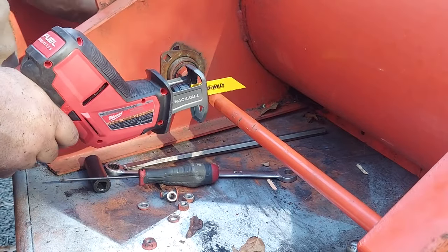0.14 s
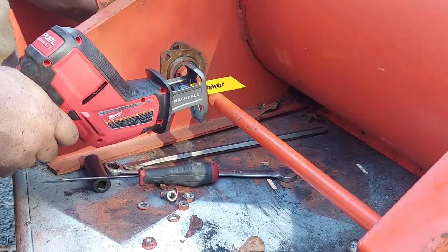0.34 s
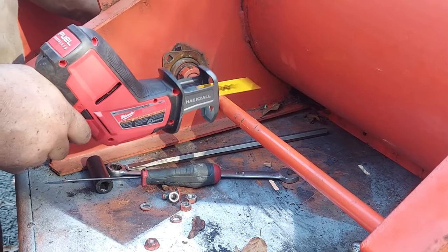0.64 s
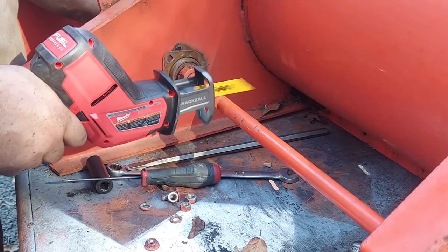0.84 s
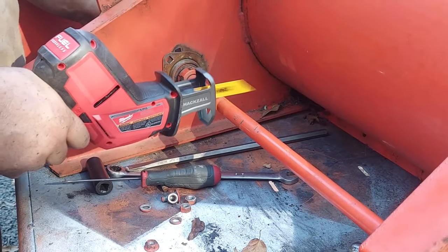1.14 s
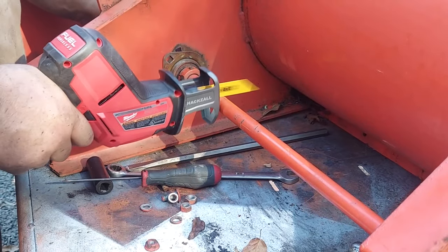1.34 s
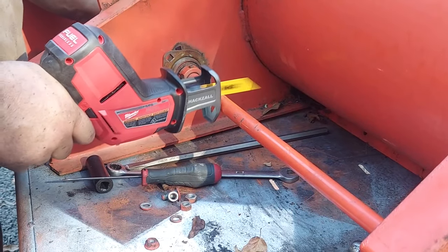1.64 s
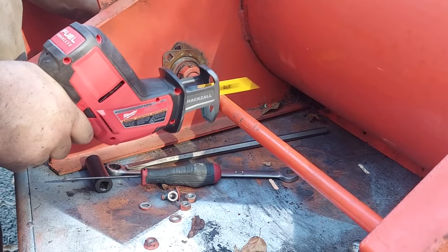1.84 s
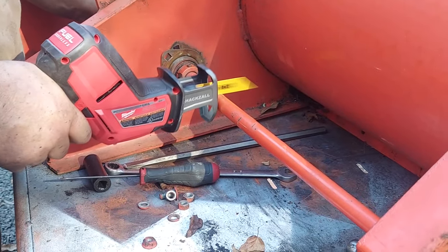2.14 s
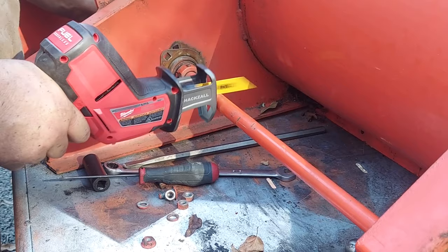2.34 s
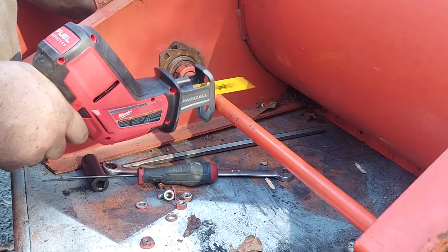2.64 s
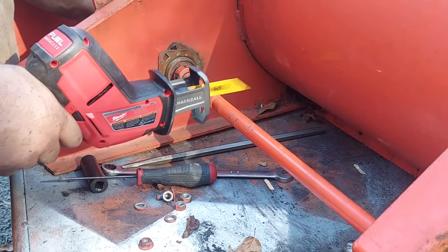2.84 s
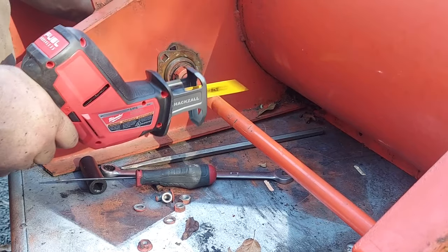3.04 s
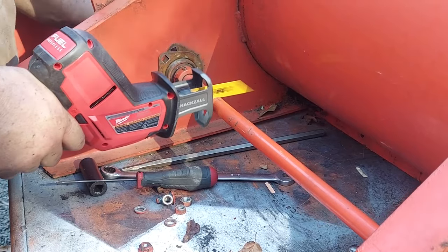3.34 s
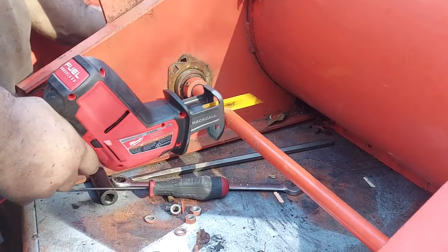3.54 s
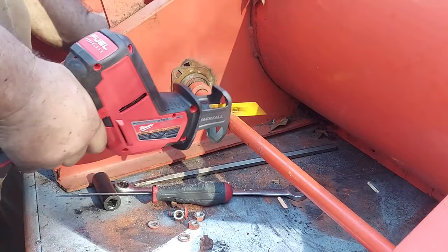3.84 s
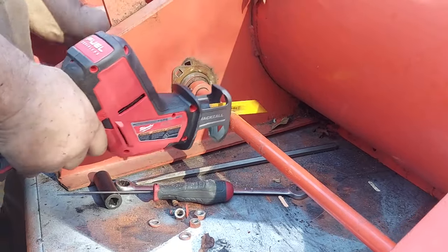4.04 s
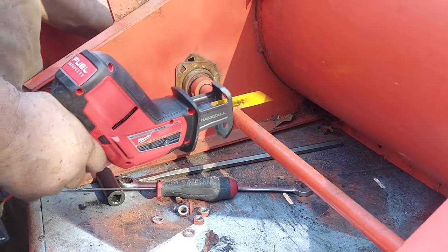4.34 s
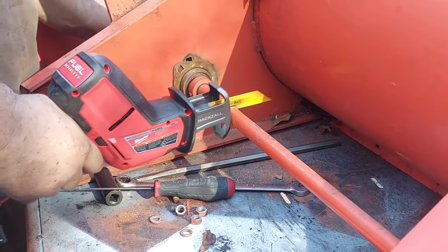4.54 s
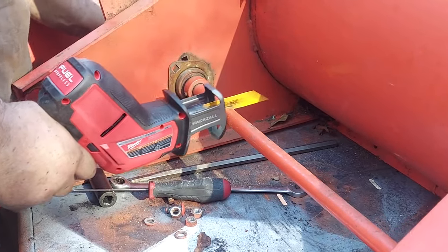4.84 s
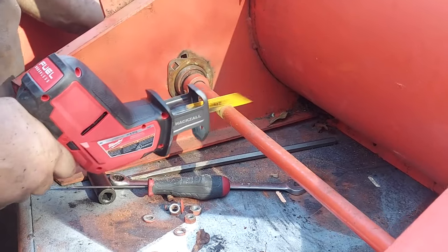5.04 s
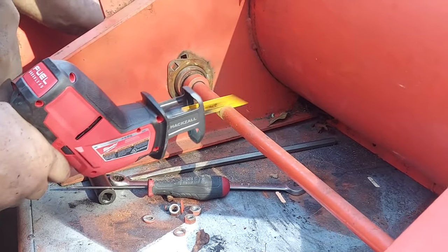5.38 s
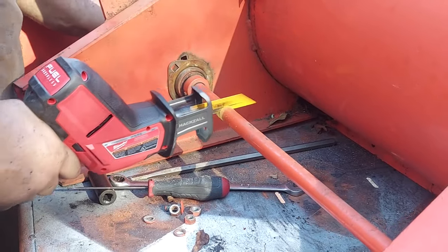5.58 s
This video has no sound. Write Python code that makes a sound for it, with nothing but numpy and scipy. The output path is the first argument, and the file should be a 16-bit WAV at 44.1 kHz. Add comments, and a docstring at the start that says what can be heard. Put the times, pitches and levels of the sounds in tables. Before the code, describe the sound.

A blade clinks lightly against steel, then a cordless reciprocating saw starts cutting a shaft inside a sheet-metal housing. Its rapid strokes rattle and ring the metal, with a hissing rasp and a thin high tone on top. About halfway through, the rasp drops out and the sawing abruptly turns into a much higher, sped-up buzz, steps up once more and runs on. The sound is close, over very faint background noise.

```python
"""Reciprocating saw on a steel shaft

A cordless saw clinks down inside a sheet-metal housing and cuts at about 41 strokes a second.
Each stroke shakes the panels, rattles shoe and blade and rings the shaft; the teeth rasp on top.
After three seconds the rasp drops out and the cut runs in fast motion, five and then six times
as fast, with pitch and stroke rate rising to match."""
import sys
import numpy as np
from scipy import signal
from scipy.fft import rfft, irfft, next_fast_len
from scipy.io import wavfile
from scipy.ndimage import uniform_filter1d, map_coordinates

SR = 44100
rng = np.random.default_rng(int(sys.argv[2]) if len(sys.argv) > 2 else 0)


def unload_audio(sound):
    """Save the sound as a 16-bit wav file, at the path given as the first command line argument."""
    columns = np.transpose(np.atleast_2d(sound))
    # keep every value between -1 and 1, then stretch to whole-number steps
    steps = np.round(np.clip(columns, -1, 1) * 32767)
    wavfile.write(sys.argv[1], SR, steps.astype(np.int16))


N = 251811


def from_db(db):
    """Decibels to gain."""
    return 10 ** (np.asarray(db) / 20)


def rms_one(x):
    """Scale to unit power."""
    return x / np.sqrt(np.mean(x ** 2) + 1e-20)


def in_time(rows, t):
    """Read each column of an automation curve at the times t."""
    s, *columns = np.transpose(rows)
    return [np.interp(t, s, c) for c in columns]


def at_hz(points, hz):
    """Read a curve on a log-frequency axis."""
    f, value = np.transpose(points)
    return np.interp(np.log(hz + 1e-3), np.log(f), value)


def drift(t, rate):
    """Random modulation of spread 1 that turns about rate times a second."""
    knots = np.arange(t[0], t[-1] + 2 / rate, 1 / rate)
    return np.interp(t, knots, rng.standard_normal(len(knots))) * np.sqrt(3 / 2)


def rise(t, s, edge_s):
    """A smooth step from 0 to 1, centred on s."""
    return .5 + .5 * np.sin(np.pi * np.clip((t - s) / edge_s, -.5, .5))


def spell(t, start, end, edge_s):
    """Swell, hold and fade."""
    return rise(t, start, edge_s) * (1 - rise(t, end, edge_s))


def faded(x, edge_s=0.002):
    """Soften both ends of a stretch."""
    age = np.arange(x.shape[1]) / SR
    return x * np.sin(np.pi / 2 * np.minimum(np.minimum(age, age[::-1]) / edge_s, 1))


def evened(x, window_s=0.052):
    """Ride the gain to hold the running power at 1."""
    power = uniform_filter1d(np.mean(x ** 2, axis=0), int(window_s * SR))
    return x / np.sqrt(np.abs(power) + 1e-12)


def resonances(modes, hz):
    """Parallel resonators of alternating sign, rolled off steeply outside their range."""
    bank = sum((-1) ** k * from_db(db) * 1j * hz * width / (f * f - hz * hz + 1j * hz * width)
               for k, (f, width, db) in enumerate(modes))
    low, high = 0.56 * modes[0][0], 1.55 * modes[-1][0]
    return bank / np.sqrt((1 + (low / (hz + 1)) ** 8) * (1 + (hz / high) ** 8))


# stereo image at natural speed: (frequency [Hz], left-right correlation [0-1])
LIKENESS = [(100, 0.97), (500, 1), (1000, 0.74), (2500, 0.47), (8000, 0.11), (14000, 0.33)]
def radiate(pair, response, speed=1, left_lag_s=.00009):
    """Colour a mid-side pair by a response pitched up by speed; the left side arrives later."""
    size = next_fast_len(pair.shape[1])
    hz = np.arange(size // 2 + 1) * SR / size / speed
    mid, side = rfft(pair, size) * response(hz)
    alike = np.clip(at_hz(LIKENESS, hz), 0, 1)
    mid, side = np.sqrt(1 + alike) * mid, np.sqrt(1 - alike) * side
    left = (mid + side) * np.exp(-2j * np.pi * hz * left_lag_s)
    return irfft(np.array([left, mid - side]), size)[:, :pair.shape[1]]


# room tone colour: (frequency [Hz], level [dB])
AIR = [(30, -16), (100, -9.5), (270, -14.5), (600, -23.5), (1170, -35), (1540, -25), (2300, -44),
       (4700, -43.5), (6250, -25.5), (8900, -47), (16000, -70)]
def room_tone():
    """A faint bed of rumble and hiss from the surroundings."""
    bed = radiate(rng.standard_normal((2, N)), lambda hz: from_db(at_hz(AIR, hz)))
    return from_db(-57.5) * rms_one(bed)


# blade and trigger touch before the motor starts: (time [s], clink [dB], knock [dB])
TOUCHES = [(0.239, -28.5, -43), (0.248, -35, -43.5), (0.277, -52, -37), (0.288, -52, -49),
           (0.304, -60, -63), (0.363, -58, -56), (0.407, -31.5, -30.5)]
# partials of the free blade: (frequency [Hz], level [dB], t60 [s])
CLINK = [(3844, 6.5, 0.053), (3937, 4, 0.022), (7700, -13, 0.039), (8300, -18, 0.039)]
def touches(t, knock_t60=0.14, tail_t60=0.48, tail_db=-13, tick_db=-9):
    """Each touch clinks the blade and sends a knock through the housing, with a gritty tick on top."""
    clink, knock, tick = np.zeros((3, len(t)))
    for s, clink_db, knock_db in TOUCHES:
        age = np.maximum(t - s, 0)
        attack = np.minimum(age / .002, 1)
        for hz, db, t60 in CLINK:
            clink += attack * from_db(clink_db + db - 60 * age / t60) * np.sin(2 * np.pi * hz * age)
        hit = (t >= s) * from_db(knock_db)
        decay = from_db(-60 * age / knock_t60)
        knock += hit * (decay + from_db(tail_db - 60 * age / tail_t60))
        tick += hit * decay * from_db(tick_db)
    body = radiate(rng.standard_normal((2, len(t))), lambda hz: resonances(PANEL + SHOE + BLADE, hz))
    grit = radiate(rng.standard_normal((2, len(t))), lambda hz: from_db(at_hz(RASP, hz)))
    return clink + knock * rms_one(body) + tick * rms_one(grit)


def stroke_force(t, turns, speed, swing_db, pull_db, jolt_db=1):
    """Force swings twice a turn, harder on the pull than the return, and jolts as teeth catch."""
    angle = 2 * np.pi * turns
    jolts = drift(t, 450 * speed)
    return from_db(swing_db * np.cos(2 * angle) + pull_db * np.cos(angle) + jolt_db * jolts)


# rasp colour: (frequency [Hz], level [dB])
RASP = [(1820, -43), (3100, -4.5), (3480, -6.5), (3780, -4), (4100, -7.5), (4540, -1.5), (5380, -9.5),
        (6090, -7), (7120, -13.5), (7880, -9.5), (8560, -17), (9540, -18.5), (12100, -15), (15200, -18.5),
        (15800, -12)]
# rasp envelope: (time [s], level [dB])
BITE = [(0.41, -40.5), (0.46, -24.5), (0.5, -32), (1.05, -27), (2.13, -29), (2.36, -26.5), (2.96, -27.5)]
# the blade's thin note: (time [s], pitch [Hz], level [dB])
SINGING = [(0.42, 7900, -59), (0.49, 7950, -34), (0.57, 8250, -36), (0.85, 8130, -37.5), (1.15, 7950, -41),
           (2.0, 7950, -45), (2.95, 7860, -44)]
def teeth(t):
    """Teeth tear chips off the steel on every stroke, and the blade sings thinly."""
    turns = np.cumsum(in_time(CRANK, t)[0]) / SR
    force = stroke_force(t, turns, 1, swing_db=1.5, pull_db=1.2)
    grain = from_db(3.9 * rng.standard_normal(len(t)))
    chips = force * grain * rng.standard_normal((2, len(t)))
    rasp = evened(radiate(chips, lambda hz: from_db(at_hz(RASP, hz))))
    note_hz, note_db = in_time(SINGING, t)
    phase = 2 * np.pi * np.cumsum(note_hz) / SR
    note = np.array([drift(t, 260) * np.sin(phase) + drift(t, 180) * np.cos(phase) for _ in range(2)])
    return from_db(in_time(BITE, t)[0] + 5) * rasp + from_db(note_db) * rms_one(force * note)


# the saw bounces in the cut: (start [s], end [s], added looseness [0-1])
BOUNCES = [(.3, .82, .52), (1.274, 1.98, 0.47), (2.77, 2.97, 0.3), (3.082, 3.156, 0.32), (3.66, 4.25, 0.35)]
def looseness(t, seated=0.22, edge_s=0.19):
    """Share of the rattle that is new on every stroke: small when seated, large when bouncing."""
    bounce = sum(share * spell(t, start, end, edge_s) for start, end, share in BOUNCES)
    return np.clip(seated + bounce, .02, .98)


def repeating_rattle(turns, memory=0.97):
    """A rattle locked to the crank: each stroke keeps most of the pattern of the one before."""
    size, count = int(len(turns) / turns[-1]), int(turns[-1]) + 102
    pattern = signal.lfilter([1], [1, -memory], rng.standard_normal((count, size)), axis=0)[100:]
    return rms_one(map_coordinates(pattern.ravel(), [turns * size], order=3))


def crank_tones(t, turns, speed, harmonics, waver=0.15):
    """Clean multiples of the stroke rate, each wavering in level and phase."""
    out = np.zeros((2, len(t)))
    for k, db in harmonics:
        phase = 2 * np.pi * (k * turns + rng.random()) + waver * drift(t, 5 * speed)
        apart = k * (rng.normal(0, 0.036) - .028)   # higher tones sit wider in stereo
        out += from_db(db) * (1 + waver * drift(t, 5 * speed)) * np.sin([phase + apart, phase])
    return rms_one(out)


def ringing(t, speed, loose, drive, modes):
    """A part rings at about unit level, taking up the shaking unevenly."""
    ring = evened(radiate(drive, lambda hz: resonances(modes, hz), speed), window_s=0.057)
    return ring * from_db(1.58 * np.sqrt(loose) * drift(t, 16 * speed))


def throb(t, turns, speed, loose, harmonics):
    """The crank's low end; a bouncing saw adds a bump twice a turn."""
    tones = crank_tones(t, turns, speed, harmonics, waver=0.26)
    bump = crank_tones(t, turns, speed, [(2, 0)], waver=0.42)
    return tones + from_db(-3) * loose ** 2 * bump


# gearbox and frame modes at natural speed: (frequency [Hz], width [Hz], level [dB])
GEARBOX = [(213, 34, -12), (254, 24, -6.5), (321, 74, -13), (372.7, 27, 1), (417, 56, -3.5)]
FRAME = [(49.6, 54, -10), (77, 30, -0.5), (120, 7.5, 9), (164, 165, -4.5)]
def gearbox(t, turns, speed, loose, knocks, harmonics):
    """The gearbox hums when seated and clatters when loose; its knocks thud through the frame."""
    hum = crank_tones(t, turns, speed, harmonics, waver=0.52)
    clatter = ringing(t, speed, loose, knocks, GEARBOX)
    thud = ringing(t, speed, loose, knocks, FRAME)
    return np.sqrt(1 - loose) * hum + np.sqrt(loose) * clatter + from_db(-24.5) * thud


# panel modes at natural speed: (frequency [Hz], width [Hz], level [dB])
PANEL = [(483.5, 40, -3.5), (556.6, 32, 3), (620.6, 24, 1.5), (657, 14.6, 2), (754, 90, -6),
         (824, 38, -0.5)]
# panel envelope: (time [s], level [dB])
PANEL_LEVEL = [(.5, -24), (.8, -24.5), (1.45, -19), (1.7, -20.5), (1.95, -22.5), (2.2, -20), (2.88, -27.5),
               (2.97, -32.5), (3.45, -25), (5.28, -25.5), (5.4, -20), (5.71, -22.8)]
def panels(t, turns, speed, loose, knocks, harmonics):
    """The sheet metal drones with the crank's upper harmonics and clangs under its knocks."""
    drone = crank_tones(t, turns, speed, harmonics, waver=0.41)
    clang = ringing(t, speed, loose, knocks, PANEL)
    return from_db(in_time(PANEL_LEVEL, t)[0]) * (np.sqrt(1 - loose) * drone + np.sqrt(loose) * clang)


# steel modes at natural speed: (frequency [Hz], width [Hz], level [dB])
SHOE = [(863, 160, -6.5), (989, 45.6, 2), (1088, 76, -2), (1233, 36.5, 4), (1348, 200, -5.5)]
SHAFT = [(1462, 59, -16.5), (1524.3, 13.8, 0)]
BLADE = [(1669, 90, -4.5), (1953, 49, -5.5), (2085, 114, -11.5), (2542, 174, -3.5), (2632, 90, -2),
         (2904, 300, -13)]
BLADE_DEEP = [(1667, 89, -2.5), (1870, 124, -1.5), (2110, 130, -2), (2410, 89, -11), (2420, 220, 0),
              (2600, 60, -11)]   # damped, deep in the slot
# the teeth grab: (time [s], length [s], shaft boost [dB], blade boost [dB])
GRABS = [(0.522, 0.026, 10, -6), (0.674, .06, 7, -4.5), (1.145, 0.18, 3, 3.5), (1.847, 0.038, 7, 1),
         (2.35, 0.17, 5.5, 2), (2.59, 0.21, 4, 2.5), (2.763, .07, 6.5, 1), (2.886, 0.044, 8, 2.5),
         (3.293, 0.19, 0, 5), (3.434, 0.046, 1, 4.5), (3.602, .09, 0, 7.5), (3.97, 0.16, 2.5, 3),
         (4.289, 0.11, 5, 2.5), (4.564, 0.1, 6.5, 2.5), (4.87, 0.022, 10.5, 5), (5.1, 0.046, 4, 6.5),
         (5.71, 0.028, 10, -1)]
def steel(t, speed, loose, rattle, knocks, blade_modes, shoe_db, shaft_db, blade_db):
    """Shoe, shaft and blade ring with the rattle; the thin blade repeats itself least."""
    for s, length_s, shaft_boost_db, blade_boost_db in GRABS:
        grab = np.exp(-2 * ((t - s) / length_s) ** 2)
        shaft_db = shaft_db + shaft_boost_db * grab
        blade_db = blade_db + blade_boost_db * grab
    shoe = from_db(shoe_db) * ringing(t, speed, loose, rattle + 0.086 * knocks, SHOE)
    shaft = from_db(shaft_db) * ringing(t, speed, loose, rattle + 0.073 * knocks, SHAFT)
    blade = from_db(blade_db) * ringing(t, speed, loose, rattle + 0.45 * knocks, blade_modes)
    return shoe + pinch(t) * (shaft + blade)


# crank speed as heard in each stretch: (time [s], rate [strokes/s])
CRANK = [(0.5, 41.9), (1.14, 41.3), (1.18, 40.9), (2.07, 41.5), (2.68, 40.7), (2.8, 41.8), (2.96, 40.9)]
CRANK_FAST = [(2.971, 208.1), (3.224, 200), (3.294, 201.5), (3.399, 198.7)]
CRANK_FASTER = [(3.409, 235), (3.54, 238.9), (3.71, 229.9), (3.77, 236.4), (3.818, 225.5), (3.88, 235.1),
                (4.0, 238.5), (4.199, 236), (4.351, 234.8), (4.47, 228.8), (4.58, 235.7), (4.68, 229.5),
                (4.86, 231.7), (4.94, 236.7), (5.12, 240.9), (5.4, 234.4), (5.71, 231.4)]
# crank tones, balanced within throb (1-4), gearbox (5-11), panels (12-20): (harmonic, level [dB])
HARMONICS = [(1, -60), (2, -37), (3, -26), (4, -27.5), (5, -26.5), (6, -24.5), (7, -22), (8, -25.5),
             (9, -12), (10, -15.5), (11, -17.5), (12, -8.5), (13, 2), (14, -3), (15, -2.5), (16, -3),
             (17, -31), (18, -14.5), (19, -23.5), (20, -4.5)]
HARMONICS_FAST = [(1, -33.5), (2, -28), (3, -17), (4, -13), (5, -6.5), (6, -7), (7, -13), (8, -5.5),
                  (9, -14), (10, 3.5), (11, -6.5), (12, -11), (13, -14), (14, -4), (15, 2.5), (16, -4),
                  (17, -14), (18, -19), (19, -8), (20, -23)]
HARMONICS_FASTER = [(1, -37.5), (2, -27.5), (3, -4), (4, -24), (5, -11.5), (6, -6.5), (7, -0.5), (8, -10.5),
                    (9, -8.5), (10, -2.5), (11, -3.5), (12, -7), (13, -2.5), (14, -21), (15, 2.5),
                    (16, -10), (17, 0), (18, -11.5), (19, -7), (20, -3)]
# base mix: (unloaded rate [natural strokes/s], throb [dB], gearbox [dB], shoe [dB], shaft [dB], blade [dB])
MIX = (45.5, -50.5, -34.5, -20.5, -22.5, -19)
MIX_FAST = (43, -51, -38, -23, -23, -23)
MIX_FASTER = (41, -34, -35, -24, -23, -24)
def cutting(t, speed, crank, mix, harmonics, blade_modes, full_sag=2.72):
    """The crank shakes every part; speed is the fast-motion factor."""
    free_rate, throb_db, gearbox_db, shoe_db, shaft_db, blade_db = mix
    rate, loose = in_time(crank, t)[0], looseness(t)
    turns = np.cumsum(rate) / SR
    load = np.clip((free_rate - rate / speed) / full_sag, .08, 1)   # load slows the crank
    forming_s = (t - t[0]) * (speed == 1)   # the forming slot guides the saw and calms it
    throb_gain = load * from_db(throb_db - 14 * let_up(t))
    gearbox_gain = from_db(gearbox_db + 6 * load - 3.4 * forming_s - 2.5 * let_up(t))
    calm_db = -1.0 * forming_s

    steady, fresh = np.sqrt(1 - loose), np.sqrt(loose)
    force = stroke_force(t, turns, speed, swing_db=-0.86, pull_db=2.2)
    knocks = force * rng.standard_normal((2, len(t)))
    pattern = np.array([repeating_rattle(turns), repeating_rattle(turns)])
    rattle = fresh * knocks + steady * force * pattern

    sound = throb_gain * steady * throb(t, turns, speed, loose, harmonics[:4])
    sound += gearbox_gain * gearbox(t, turns, speed, loose, knocks, harmonics[4:11])
    sound += panels(t, turns, speed, loose, knocks, harmonics[11:])
    sound += steel(t, speed, loose, rattle, knocks, blade_modes,
                   shoe_db + calm_db, shaft_db, blade_db + calm_db)
    hand_pressure = from_db(fresh * drift(t, 22 * speed))
    return sound * hand_pressure


# snag accents: (time [s], half length [s], boost [dB])
SNAGS = [(0.518, .007, 4), (0.661, .006, 7), (0.71, .006, 4), (2.75, .007, 3), (2.89, .02, 2),
         (3.83, .02, 1.5), (4.137, .012, 2.5)]
def snags(t):
    """Gain bumps where the blade snags and the whole saw kicks."""
    return from_db(sum(db * np.exp(-((t - s) / half_s) ** 2) for s, half_s, db in SNAGS))


def let_up(t):
    """The hand eases off for a moment, 0 to 1."""
    return spell(t, start=4.99, end=5.26, edge_s=0.2)


def whistle(t, harmonic=15):
    """As the hand lets up, one crank harmonic meets a panel resonance and swells."""
    turns = np.cumsum(in_time(CRANK_FASTER, t)[0]) / SR
    return from_db(-26) * let_up(t) * crank_tones(t, turns, 6, [(harmonic, 0)])


def pinch(t, at_s=5.17, choke_db=-13, ease_s=0.1, lasting=0.11):
    """Gain dip as the slot pinches and chokes the ringing, then mostly lets go."""
    easing = np.exp(-np.maximum(t - at_s, 0) / ease_s)
    return from_db(choke_db * rise(t, at_s, edge_s=0.065) * (lasting + (1 - lasting) * easing))


def scene(fast_s=2.967, faster_s=3.403):
    """The saw is set down and started, then runs on in fast motion."""
    t = np.arange(N) / SR
    start, fast, faster = (int(s * SR) for s in (TOUCHES[-1][0], fast_s, faster_s))
    out = room_tone()
    out[:, fast:] *= from_db(-22)   # the bed ducks in fast motion
    out[:, :fast] += touches(t[:fast])
    natural = t[start:fast]
    spin_up = rise(natural, 0.437, edge_s=0.083)
    first_cut = spin_up * cutting(natural, 1, CRANK, MIX, HARMONICS, BLADE)
    out[:, start:fast] += faded(first_cut + teeth(natural))
    out[:, fast:faster] += faded(cutting(t[fast:faster], 5, CRANK_FAST, MIX_FAST, HARMONICS_FAST, BLADE))
    deep_cut = cutting(t[faster:], 6, CRANK_FASTER, MIX_FASTER, HARMONICS_FASTER, BLADE_DEEP)
    out[:, faster:] += faded(deep_cut + whistle(t[faster:]))
    return snags(t) * out * from_db([[-.4], [.4]])   # leans slightly right


def record(dry, ceiling=0.67, cutoff_hz=15780):
    """Soft-clip the highest peaks and cut the top end steeply."""
    rounded = dry / (1 + (dry / ceiling) ** 8) ** (1 / 8)
    return signal.sosfilt(signal.ellip(12, .1, 80, cutoff_hz, fs=SR, output="sos"), rounded)


dry = scene()
out = record(dry)
unload_audio(out)
```